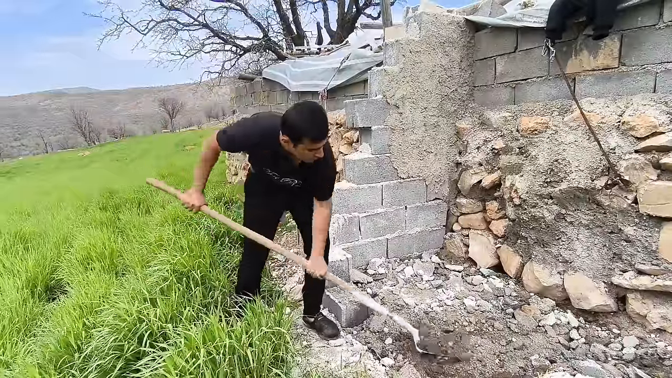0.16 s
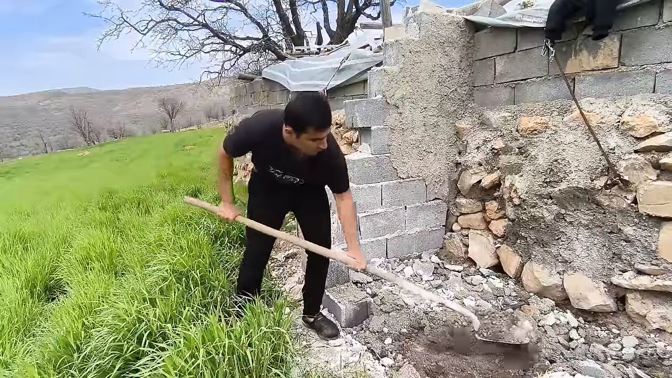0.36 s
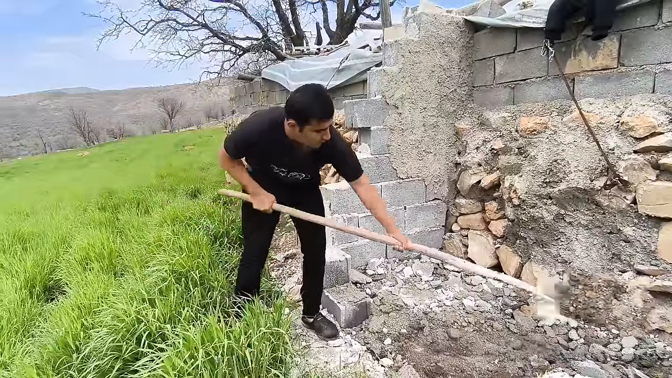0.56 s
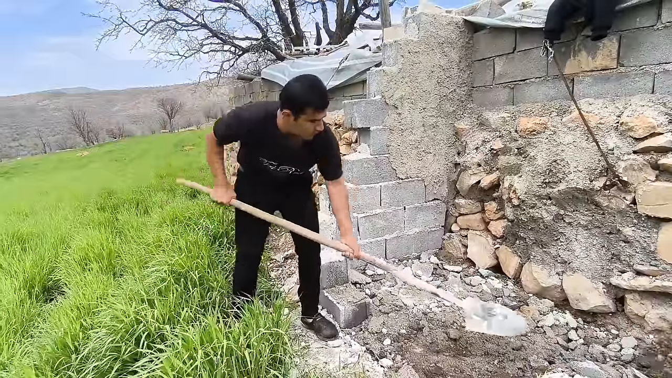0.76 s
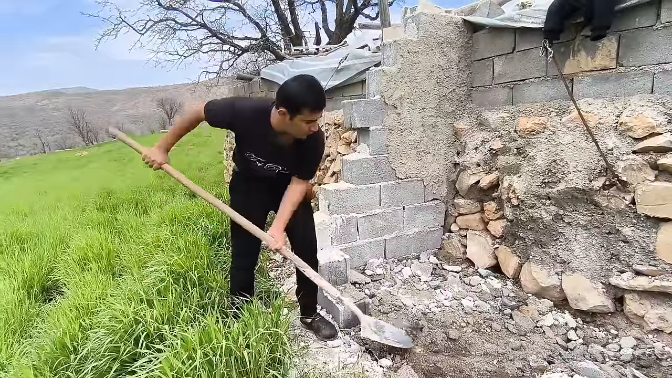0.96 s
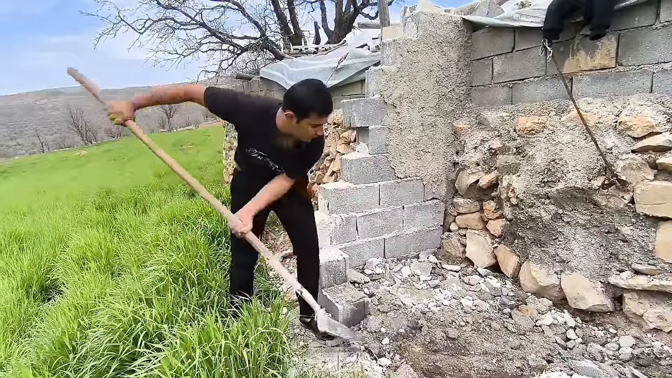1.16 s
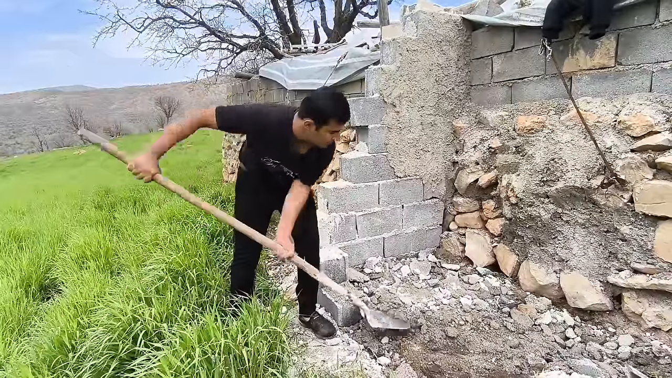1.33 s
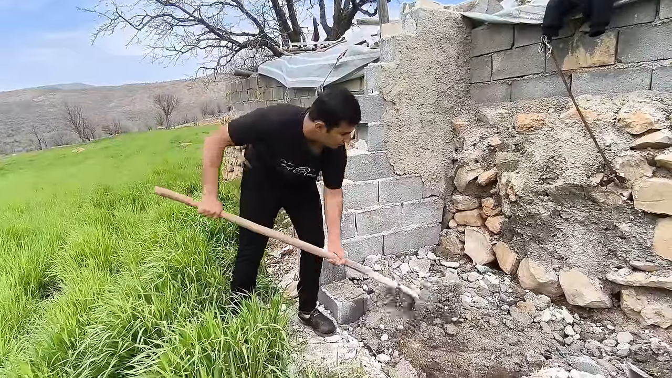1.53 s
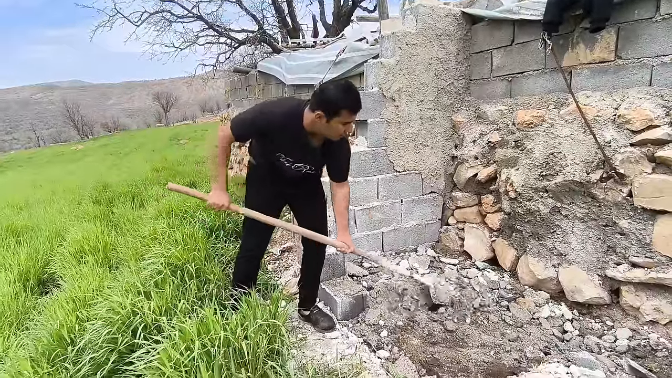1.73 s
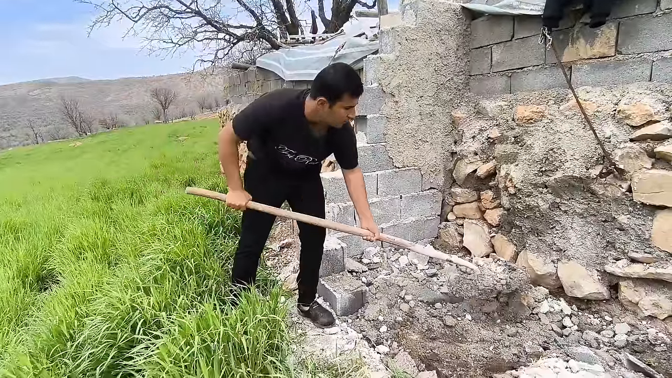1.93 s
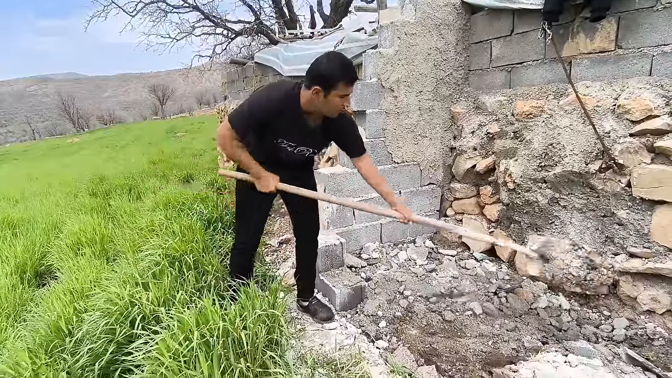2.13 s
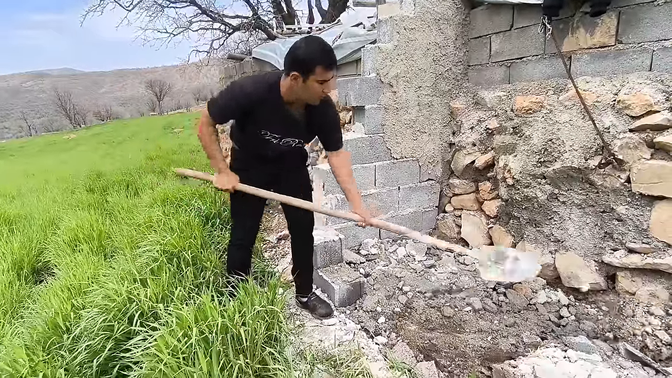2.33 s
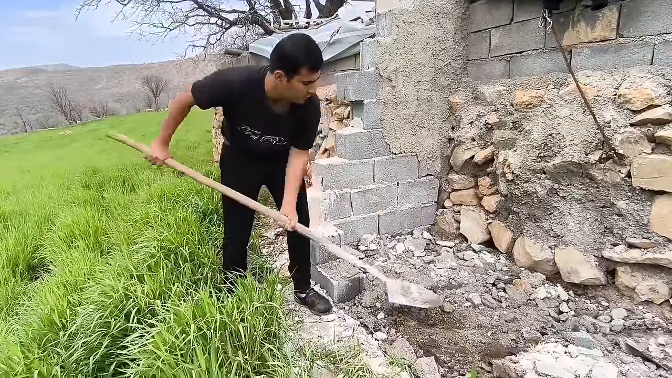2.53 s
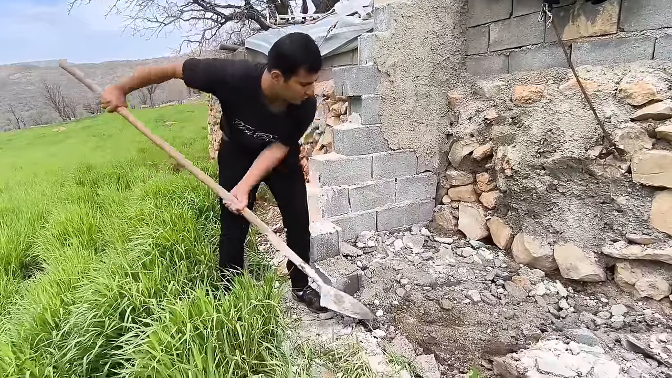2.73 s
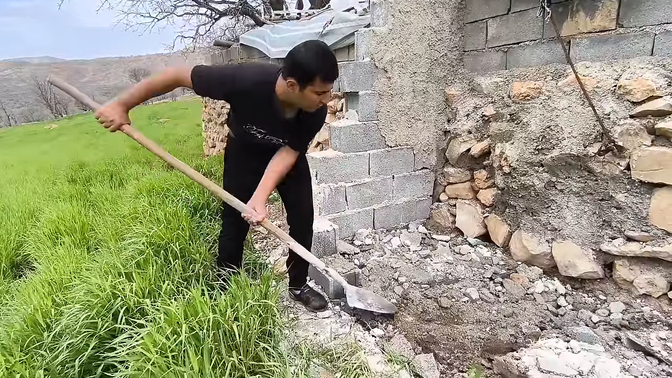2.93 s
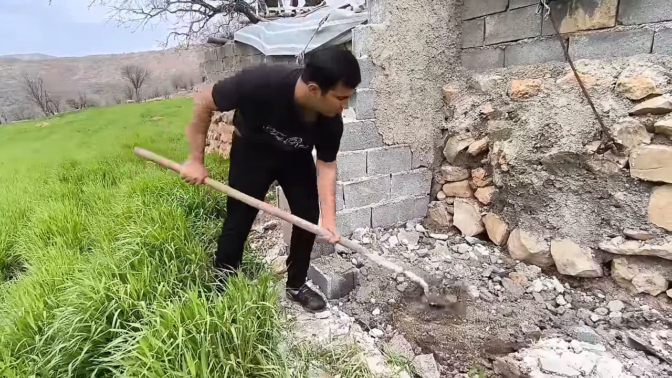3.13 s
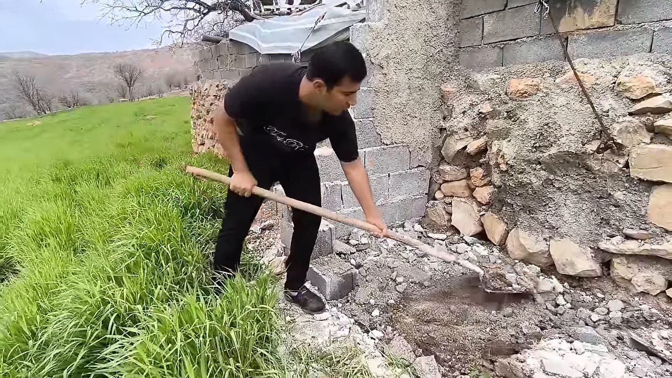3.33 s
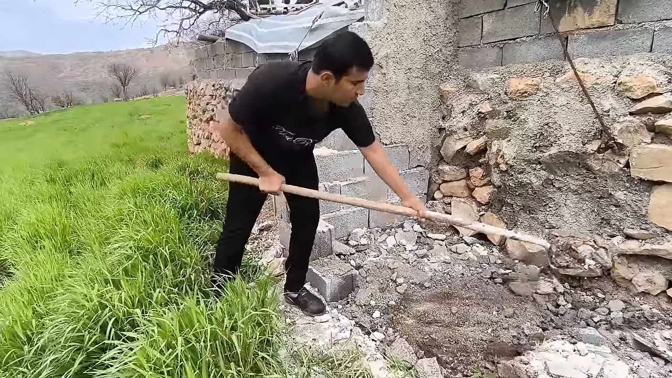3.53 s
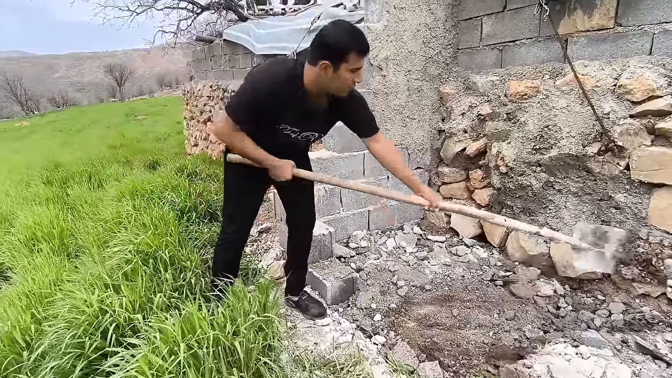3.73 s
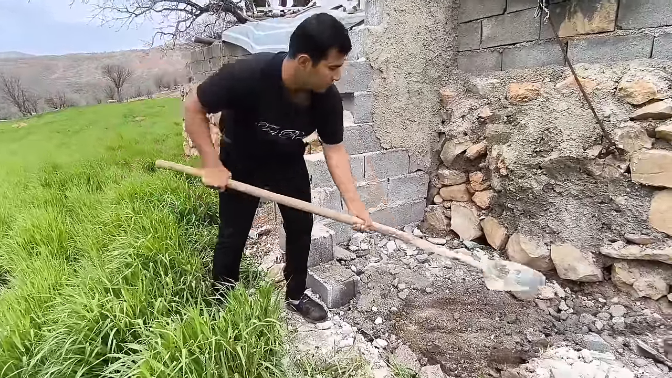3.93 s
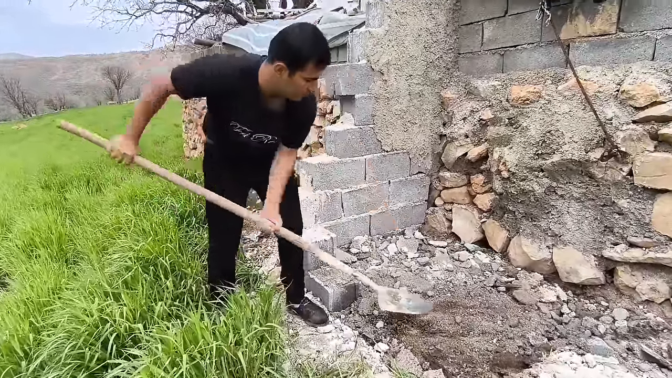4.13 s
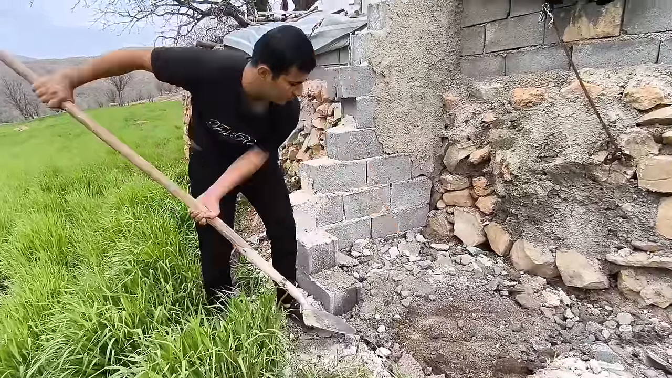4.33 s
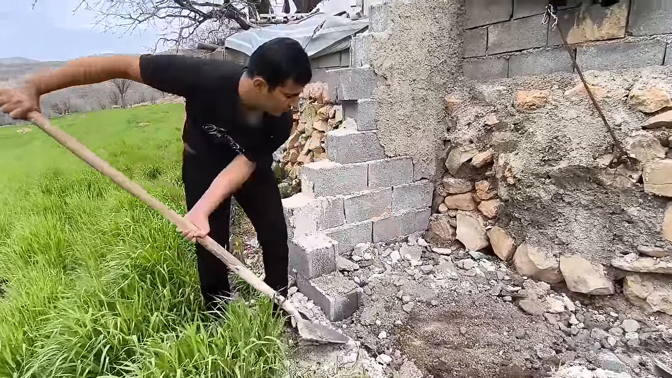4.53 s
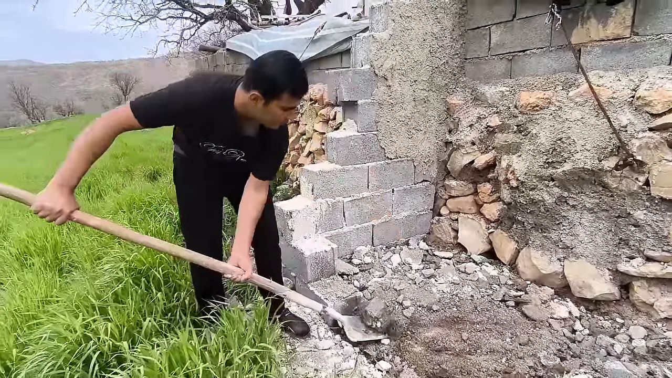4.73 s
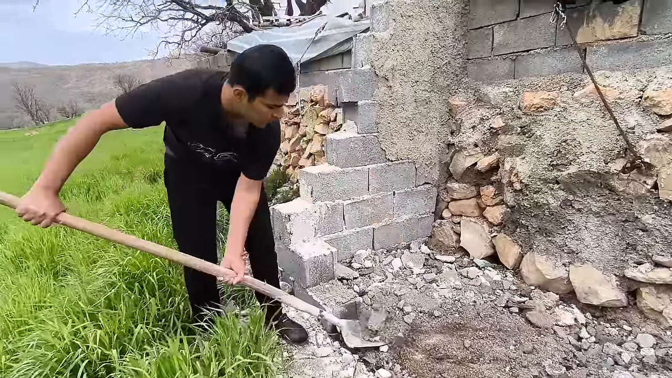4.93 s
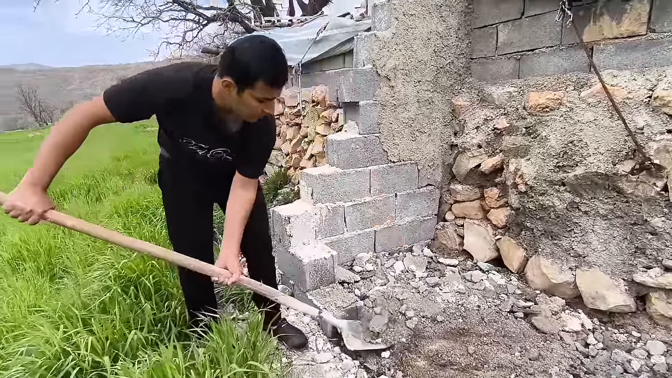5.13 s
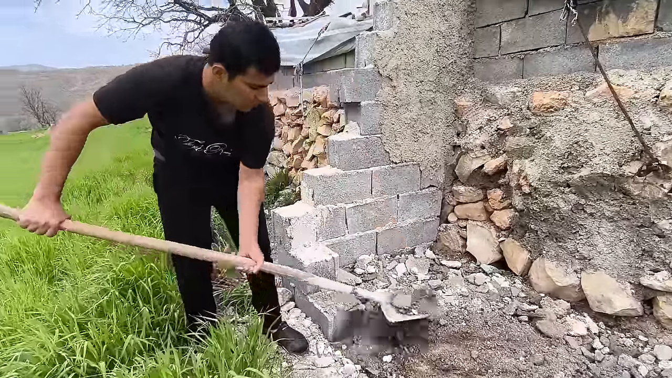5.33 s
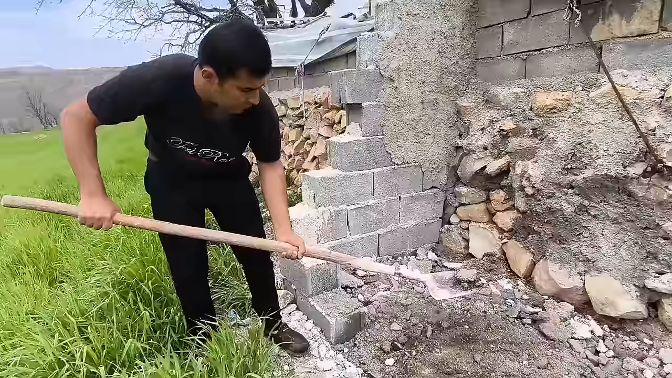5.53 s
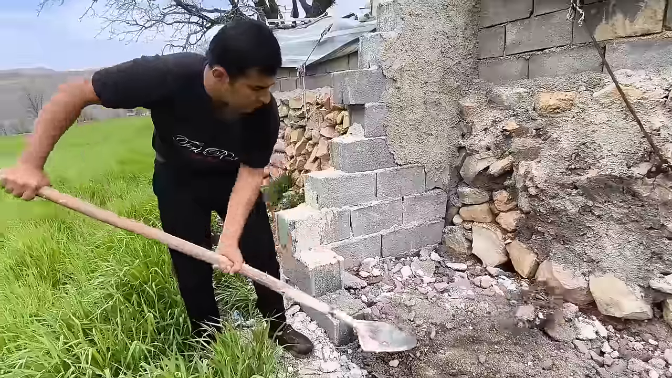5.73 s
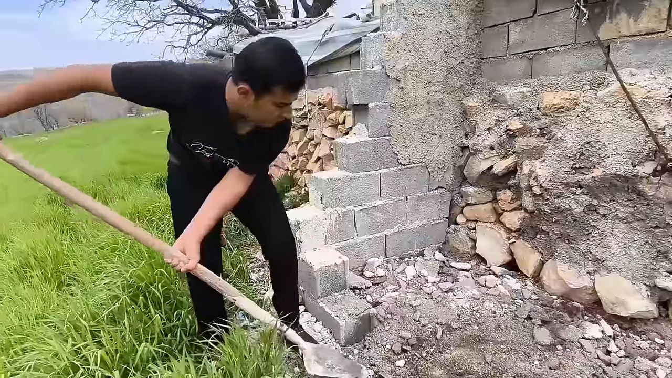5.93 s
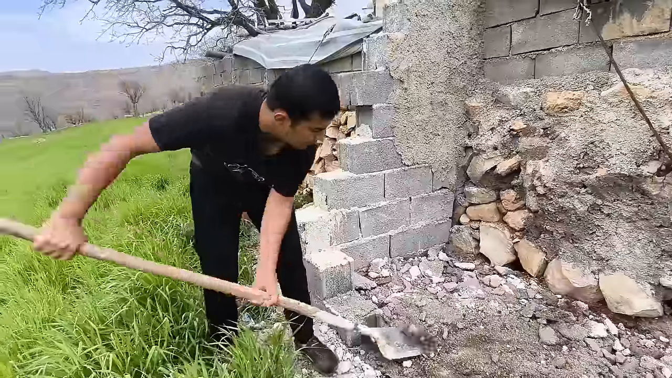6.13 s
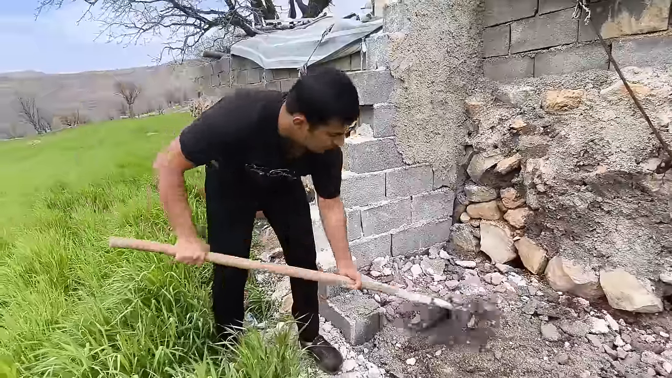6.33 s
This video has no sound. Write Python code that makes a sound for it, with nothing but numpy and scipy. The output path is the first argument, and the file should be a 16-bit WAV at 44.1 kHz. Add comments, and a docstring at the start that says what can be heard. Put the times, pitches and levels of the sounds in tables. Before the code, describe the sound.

Five brief gritty shovel strokes, bright and rasping with blunt knocks of stone on steel, dominate the foreground. After each, thrown dirt slides, swells and lands in dry patters with small sharp clinks. A dull pounding, perhaps a hand tool, carries on quietly and quickly in the distance with uneven rebounds. The place is open air, dry, with a faint low murmur; the microphone is near.

```python
"""A steel shovel bites five times into stony rubble, close to a two-port microphone.
Blade pressure drives noisy grains of grit, pebble knocks and blows through the colours of the steel;
soil slides and patters down as swelling grain noise, and single stones clink as ticks with short rings.
Farther off a dull thumping of soft noise puffs repeats three to four times a second, with rebounds,
perhaps a hand tool pounding; behind it lies a low outdoor murmur of coloured noise."""
import sys
import numpy as np
from scipy import signal
from scipy.fft import rfft, irfft
from scipy.io import wavfile
from scipy.ndimage import uniform_filter1d

SR = 44100
rng = np.random.default_rng(int(sys.argv[2]) if len(sys.argv) > 2 else 0)


def unload_audio(sound):
    """Save the sound as a 16-bit wav file, at the path given as the first command line argument."""
    columns = np.transpose(np.atleast_2d(sound))
    # keep every value between -1 and 1, then stretch to whole-number steps
    steps = np.round(np.clip(columns, -1, 1) * 32767)
    wavfile.write(sys.argv[1], SR, steps.astype(np.int16))


N = 280476
TIME = np.arange(N) / SR


def shovel(catch):
    """Grit, stones and blows drive the blade: low body, rasping middle, sandy top."""
    # blade meets a stone: (time [s], level [dB], body level re blow [dB], body pitch under this load [Hz])
    blows = [(0.1216, -3.5, -22, 888), (0.1272, -6.5, -12, 910), (0.1701, -10.5, -11.5, 773),
             (1.4063, -14.5, -8, 602), (1.4127, -0.5, -16, 472), (1.4465, -5, -12, 479),
             (1.5171, -21, 1.5, 532), (1.5794, -32.5, 1, 720), (3.054, -13.5, -3.5, 201),
             (3.0638, -4, -19.5, 436), (3.1121, -16, -15, 453), (3.1916, -19, -4, 660),
             (3.2237, -18.5, -16, 657), (3.3196, -26, 3.5, 725), (4.6915, -10.5, -17, 544),
             (4.7119, -7, -13.5, 760), (4.7273, -3, -14, 714), (6.1709, -20.5, -14, 197),
             (6.2084, -5.5, -8, 476), (6.318, -24.5, -1, 804), (6.3377, -15.5, -1.5, 565)]
    # low modes of the loaded blade: (frequency [Hz], width before widening [Hz], level [dB])
    body_modes = [(212, 51, -43.5), (479, 32, 8), (791, 100, 7.5)]
    # stone on steel: (frequency [Hz], relative level per Hz [dB])
    rasp_colour = [(530, -25), (900, -3), (1210, -5), (1540, 1), (2160, 3), (2940, 6), (3450, 2),
                   (4330, -16.5), (5000, -6), (6500, -24.5), (11000, -120)]
    # sand on steel: (frequency [Hz], relative level per Hz [dB])
    grit_colour = [(2350, -26), (4000, -5.5), (4410, -8), (7100, -1.5), (7980, -4), (10900, -8),
                   (12300, -12), (15100, -17), (16000, -33)]
    broad_colour = [(60, -27), (120, -11.5), (220, 3.5), (300, -13.0), (500, 9), (1000, -15.5),
                    (2000, -13.5)]
    blow_t60_s, crack_t60_s, crack_db = 0.069, 0.0078, 2

    stroke = pressed(fade_s=0.0039) * catch
    push = stroke * grains(per_s=9000, spread_db=2.5, hiss=0.85)
    thud = np.zeros(N)
    for s, db, body_db, hz in blows:
        puff = burst(blow_t60_s, .0005) + amp(crack_db) * burst(crack_t60_s, .0002)
        shares_db = np.array([[-7], [body_db], [-8]])  # into rasp, body and grit
        add(push, s - .001, amp(db + shares_db) * puff)
        # the load under the blade sets this pitch
        add(thud, s, amp(db + body_db - 1.5) * rung(puff, [(hz, 60, 0)], 0.56))

    rasp, body, grit = push
    low = amp(-5) * rung(body, body_modes, 0.94) + amp(-4.5) * coloured(body, broad_colour)
    blade = low + coloured(rasp, rasp_colour) + coloured(grit, grit_colour)
    crunch = amp(-4) * stroke[0] * pebbles(1100, 800, 7500, 7.0)
    return shifting(blade, 2.24, frames=5, bins=5) + crunch + thud


def pressed(fade_s):
    """Gains of rasp, body and grit: all follow the pressure, body and grit drifting as the load changes."""
    # pressure of the blade on the rubble, one curve a stroke: (time [s], rasp level [dB])
    strokes = [
        [(.09, -72), (.12, -31.5), (.16, -29.5), (.2, -33.5), (.236, -40), (.285, -47), (.3, -56), (.35, -65)],
        [(1.398, -54.5), (1.412, -23.5), (1.44, -25), (1.465, -26.5), (1.48, -33), (1.576, -38), (1.6, -47.5),
         (1.68, -50), (1.72, -74)],
        [(3.035, -51), (3.06, -25), (3.1, -29), (3.13, -30), (3.2, -31.5), (3.25, -35.5), (3.3, -38),
         (3.35, -43), (3.368, -55)],
        [(4.684, -57.5), (4.7, -27.5), (4.72, -32), (4.735, -19.5), (4.75, -46), (4.79, -63.5)],
        [(6.16, -94), (6.174, -46.5), (6.2, -30.5), (6.225, -18.5), (6.255, -30), (6.276, -32.5), (6.32, -33),
         (6.36, -43)],
    ]
    # what each stroke digs into: (blade body re rasp [dB], its change [dB/s],
    # fine grit re rasp [dB], its change [dB/s])
    loads = [(-1, -17, -4, -13.5), (-5.5, 16, -5, -44), (-8.5, 20.5, -7, 0), (1, -37, -9, 5),
             (-0.5, 3, 4.5, -84)]
    gains = np.zeros((3, N))
    for curve, (body_db, body_db_s, grit_db, grit_db_s) in zip(strokes, loads):
        s, db = np.transpose(curve)
        on = np.clip(np.minimum(TIME - s[0], s[-1] + fade_s - TIME) / fade_s, 0, 1)
        t = np.clip(TIME, s[0], s[-1]) - s[0]
        offsets_db = np.array([0 * t, body_db + body_db_s * t, grit_db + grit_db_s * t])
        gains += on * amp(np.interp(TIME, s, db) + offsets_db)
    return gains


def soil():
    """Loose soil as grain noise under the spill gains: dust hisses, crumbs patter."""
    # fine dust: (frequency [Hz], relative level per Hz [dB])
    dust_colour = [(1470, -35.5), (2500, -3), (2700, -3), (3980, 0.5), (6200, 1.5), (7190, -1), (8800, 0),
                   (10900, -3), (14900, -8), (16000, -8)]
    # coarse crumbs: (frequency [Hz], relative level per Hz [dB])
    crumb_colour = [(500, -10.5), (900, -2), (1500, -6.5), (3000, -7.5), (4500, -8.5), (8000, -13)]
    dust_gain, crumb_gain = spilled()
    dust = dust_gain * coloured(grains(3000, 4.05, 1.2), dust_colour) * lumps(0.011, 1.8)
    patter = coloured(grains(350, 4.3, 1.4), crumb_colour)
    crumbs = crumb_gain * (patter + amp(-5.5) * pebbles(140, 900, 9400, 1.7))
    return shifting(dust + crumbs, 2.0, frames=6, bins=8)


def spilled():
    """Gains of dust and crumbs: a thin trickle, and spills that swell, ease off and run dry."""
    # loose soil slides off or lands: (time of the turn from rise to fall [s], dust level [dB],
    # rise [dB/s], fall [dB/s], coarse crumbs re dust [dB]); a rise counts without its sign
    spills = [(.5, -61.5, 44, 41, -11.5), (0.781, -67.5, 7.5, 43, -17), (0.912, -50, 488, 45, -14.5),
              (1.04, -56.5, 106, 82, -14), (1.25, -70, 13, 42, -8), (1.66, -56, 100.5, 70, 4),
              (2.03, -55.5, 35.5, 21, -10), (2.2, -54.5, 41, 82, -7.5), (2.31, -63, 37.5, 42, -9.5),
              (2.409, -46.5, 382, 60, -10), (2.47, -62, 303, 157, -14), (2.75, -71, 11.5, 17, -5),
              (3.4, -63, 60, 15, 0), (3.62, -56.5, 33.5, -3, -8), (3.78, -57.5, 29.5, 89, -5),
              (3.999, -43, 227, 171, -9.5), (4.12, -58, 106, 18, -2.5), (4.45, -62.5, 26, 23.5, -3),
              (4.85, -56, 64, 105, 0), (5.33, -54, 93, 17, -2), (5.58, -54, 45, 37, -25),
              (5.74, -58, 18, 13, -8.5), (5.862, -42.5, 163, 192, -6), (6.02, -60.5, 33, 23, -4),
              (6.2, -67, -12, 8, -3)]
    trickle_db, trickle_crumbs_db = -72.5, 0
    gentle_s, dry_db_per_s = 0.093, 109  # after gentle_s the extra fall of running dry sets in
    power = amp(trickle_db + np.array([[0], [trickle_crumbs_db]])) ** 2 * np.ones(N)
    for s, db, rise_db_s, fall_db_s, crumbs_db in spills:
        t = TIME - s
        slope_db = np.where(t < 0, abs(rise_db_s) * t, -fall_db_s * t)
        level_db = db + slope_db - dry_db_per_s * np.maximum(t - gentle_s, 0)
        power += amp(level_db + np.array([[0], [crumbs_db]])) ** 2
    return np.sqrt(power)


def stones():
    """Each stone gives a wide tick and a short ring around its own pitch."""
    # single stones: (time [s], level [dB], pitch [Hz], ring re tick [dB])
    clinks = [(0.415, -54.5, 5060, 8), (0.663, -41.5, 770, -0.5), (0.782, -41.5, 5670, -1.5),
              (1.005, -43, 2640, -10), (1.122, -42, 10700, -5), (1.641, -40, 1000, 3.5),
              (1.713, -40.5, 2900, 10), (1.744, -43, 5590, -0.5), (1.912, -38, 7410, -23),
              (2.012, -48.5, 4960, 9.5), (2.04, -48, 1160, 3), (2.055, -42, 7190, -1),
              (2.111, -30, 11100, -4), (2.265, -43.5, 9350, -1), (2.293, -42, 5330, -5.5),
              (2.759, -50.5, 4730, 6.5), (2.926, -60.5, 4670, 11.5), (3.408, -42.5, 791, -4.5),
              (3.449, -59, 1750, 12), (3.76, -44.5, 6100, 4.5), (3.908, -43.5, 4950, 9),
              (4.145, -48.5, 2740, 3), (4.203, -52.5, 520, 13.5), (4.208, -51, 2830, 13),
              (4.824, -42.5, 3280, 1), (4.831, -40.5, 7340, -1), (4.867, -27, 7450, -8),
              (4.887, -30, 1280, -6), (4.981, -36.5, 7700, -9.5), (5.084, -39.5, 5050, -7.5),
              (5.16, -57, 293, 16), (5.316, -49, 3320, 6), (5.382, -49.5, 6900, 3), (5.439, -45.5, 740, 7),
              (5.464, -57, 810, 3), (5.62, -42.5, 9500, -8), (5.795, -47, 9800, 11.5),
              (5.835, -43.5, 5440, 13.5), (5.864, -41, 10100, -4)]
    tick_colour = [(300, -34), (1500, 12), (8000, 16.0), (16000, 3.0)]
    tick_t60_s = 0.025
    out = np.zeros(N)
    for s, db, hz, ring_db in clinks:
        puff = burst(0.06, .0001)[:3000]
        ring = rung(puff, [(hz, 0.21 * hz, 0), (1.57 * hz, 0.073 * hz, -8)], 0.81)
        tick = coloured(burst(tick_t60_s, .0001)[:3000], tick_colour)
        add(out, s, amp(db) * (amp(ring_db) * ring + tick))
    return out


def thumps():
    """Dull blows: a soft puff through a hollow colour, one pitch standing out, and a short knock on top."""
    # the far thumps and their rebounds: (time [s], level [dB], strongest pitch [Hz])
    far_blows = [(0.08, -37, 262), (0.364, -42, 392), (0.433, -42, 270), (0.654, -35, 407),
                 (0.731, -40, 380), (0.951, -35, 276), (0.975, -37.5, 224), (1.239, -42, 535),
                 (1.257, -36, 274), (1.797, -43, 246), (1.821, -30.5, 193), (1.865, -38, 327),
                 (2.058, -44.5, 211), (2.112, -31, 250), (2.253, -46, 266), (2.397, -34, 485),
                 (2.679, -37.5, 394), (2.959, -36, 266), (3.02, -38.5, 269), (3.199, -29, 232),
                 (3.526, -36, 486), (3.559, -32, 334), (3.811, -37, 230), (3.855, -41.5, 252),
                 (3.983, -41.5, 250), (4.069, -38.5, 518), (4.387, -30, 461), (4.45, -42.5, 510),
                 (4.658, -30, 473), (4.944, -33, 228), (5.222, -30.5, 428), (5.5, -35, 270),
                 (5.774, -35.5, 236), (5.819, -31, 274), (6.054, -35, 220), (6.119, -38.5, 242)]
    # hollow colour of a thump: (frequency [Hz], relative level per Hz [dB])
    hollow = [(29, -42.5), (50, -18.5), (117, -14), (237, -1.5), (318, -12), (387, -4), (592, -15),
              (795, -18), (1390, -43), (2500, -35), (3250, -69), (5500, -120)]
    t60_s, rise_s, lead_s = 0.23, 0.0064, .011  # each puff starts lead_s ahead of its listed time
    out = np.zeros(N)
    for s, db, hz in far_blows:
        puff = burst(t60_s, rise_s)
        pitch = rung(puff, [(hz, 45, 0)], 0.98)
        knock = rung(burst(.09, 0.00885), [(800, 250, -1.5), (1280, 305, -1.5)], 1)
        thump = coloured(puff, hollow) + amp(-4) * pitch + amp(-9) * knock
        add(out, s - lead_s, amp(db) * thump)
    return out


def air():
    """A low outdoor murmur of wind and distance, partly alike in both ports."""
    # open air: (frequency [Hz], relative level per Hz [dB])
    air_colour = [(15, -69.5), (25, -39), (108, 5.5), (236, 2.5), (503, -2), (607, -6.5), (1480, -26.5),
                  (4140, -27), (7310, -27.5), (11000, -36), (16000, -18.5)]
    air_db = -64
    common, left, right = (coloured(rng.standard_normal(N), air_colour) for _ in range(3))
    murmur = common + 0.92 * np.array([left, right])
    return amp(air_db) * murmur * lumps(0.38, 3.5)


def ports(shared, apart):
    """The two ports hear the same contacts out of step; some contacts favour one port."""
    # microphone ports: (frequency [Hz], phase by which the left leads [radians])
    lead = [(300, 0), (1400, 0.78), (2000, -1.5), (3200, -1.47), (4700, -2), (6400, -2), (9000, -4.5),
            (15000, -9)]
    # microphone ports: (frequency [Hz], left minus right [dB])
    tilt = [(200, -.5), (900, -0.5), (1550, 1.5), (2400, -4), (4500, -1.5), (6500, -7.5), (7600, -7.5),
            (8600, 4), (9600, 9), (10700, 9), (12000, 4), (15000, 3.5)]
    # contacts that differ between the ports: (frequency [Hz], level re shared [dB])
    apart_colour = [(100, -22.5), (500, -37.5), (1200, -3.5), (4000, -6.5), (12000, -2)]
    hz = np.fft.rfftfreq(N, 1 / SR)
    half = amp(read(tilt, hz) / 2) * np.exp(.5j * read(lead, hz))  # each port takes half the difference
    sides = rfft(apart) * amp(read(apart_colour, hz)) * np.array([[1], [-1]])
    return irfft((rfft(shared) + sides) * np.array([half, 1 / half]), N)


def grains(per_s, spread_db, hiss):
    """Random contacts, most small and a few large, over a bed of hiss."""
    size = amp(spread_db * np.minimum(rng.exponential(1, N), 5)) * rng.choice([-1, 1], N)
    contacts = evened(size * (rng.random(N) < per_s / SR))
    return evened(contacts + hiss * rng.standard_normal(N))


def pebbles(per_s, low_hz, high_hz, cycles):
    """Small stones knock at random, each size ringing a few cycles at its own pitch."""
    t, out = np.arange(600) / SR, np.zeros(N)
    size = amp(5.4 * np.minimum(rng.exponential(1, N), 4)) * (rng.random(N) < per_s / SR)
    kind = rng.integers(0, 24, N)
    pitches = np.geomspace(low_hz, high_hz, 24) * rng.uniform(0.911, 1.05, 24)
    for k, hz in enumerate(pitches):
        knock = np.sin(2 * np.pi * hz * t) * np.exp(-t * hz / cycles)
        out += signal.oaconvolve(size * (kind == k), knock / np.linalg.norm(knock))[:N]
    return evened(out)


def burst(t60, rise):
    """A puff of noise that rises, then dies away."""
    t = np.arange(8000) / SR
    swell = (1 - np.exp(-t / rise)) ** 2
    return .5 * rng.standard_normal(8000) * swell * amp(-60 * t / max(t60, .005))


def lumps(seconds, depth_db):
    """An uneven gain: stones catch and let go, or the murmur swells and sinks."""
    slow = uniform_filter1d(rng.standard_normal(N), max(round(seconds * SR), 1))
    return evened(amp(depth_db * evened(slow)))


def shifting(x, depth_db, frames, bins):
    """The colour wanders in patches as other stones and other spots of the blade take over."""
    z = signal.stft(x, nperseg=256)[2]
    along_time = uniform_filter1d(rng.standard_normal(z.shape), frames, 1)
    patches = uniform_filter1d(along_time, bins, 0)
    gain = evened(amp(depth_db * evened(patches)))
    return signal.istft(z * gain, nperseg=256)[1][:N]


def coloured(x, points):
    """Filters by a spectrum with a causal phase, keeping unit power for unit white input."""
    hz = abs(np.fft.fftfreq(4096, 1 / SR))
    log_gain = np.log(amp(np.maximum(read(points, hz), -100)))
    # the Hilbert transform of the log gain gives the minimum phase
    taps = np.fft.ifft(np.exp(np.conj(signal.hilbert(log_gain)))).real[:2048]
    return signal.oaconvolve(x, taps / np.linalg.norm(taps))[:len(x)]


def rung(x, modes, widen):
    """Rings a set of damped modes, keeping unit power for unit white input."""
    t = np.arange(4096) / SR
    taps = np.zeros(4096)
    for hz, width, db in modes:
        decay = np.exp(-np.pi * widen * width * t)
        taps += amp(db) * width * decay * np.sin(2 * np.pi * hz * t)
    return signal.oaconvolve(x, taps / np.linalg.norm(taps))[:len(x)]


def amp(db):
    """Decibels to amplitude."""
    return 10 ** (np.asarray(db) / 20)


def evened(x):
    """Scales to unit power."""
    return x / np.sqrt(np.mean(x ** 2) + 1e-20)


def read(points, hz):
    """Reads a curve between its points, along log frequency."""
    f, value = np.transpose(points)
    return np.interp(np.log(hz + 1), np.log(f + 1), value)


def add(mix, s, sound):
    """Lays a sound into the mix from time s, cut at the end."""
    part = mix[..., round(s * SR):][..., :sound.shape[-1]]
    part += sound[..., :part.shape[-1]]


def scene():
    """Close contacts and far thumps through the microphone ports, over the open air."""
    catch = lumps(0.0041, 1.62)
    shared, apart = (shovel(catch) + soil() + stones() for _ in range(2))
    return ports(shared + thumps(), apart) + air()


def record(dry):
    """The microphone port rings near 7 kHz and loses deep bass; peaks round off; then the band limit."""
    port = dry + .9 * signal.lfilter(*signal.iirpeak(7300, 22, SR), dry)
    thin = signal.sosfilt(signal.butter(4, 88, "highpass", fs=SR, output="sos"), port)
    rounded = np.tanh(thin)
    edge_hz = 16000
    band_limit = signal.firwin(511, edge_hz, window=("kaiser", 11), fs=SR)
    return signal.oaconvolve(rounded, band_limit[None], "same")


dry = scene()
out = record(dry)
unload_audio(out)
```